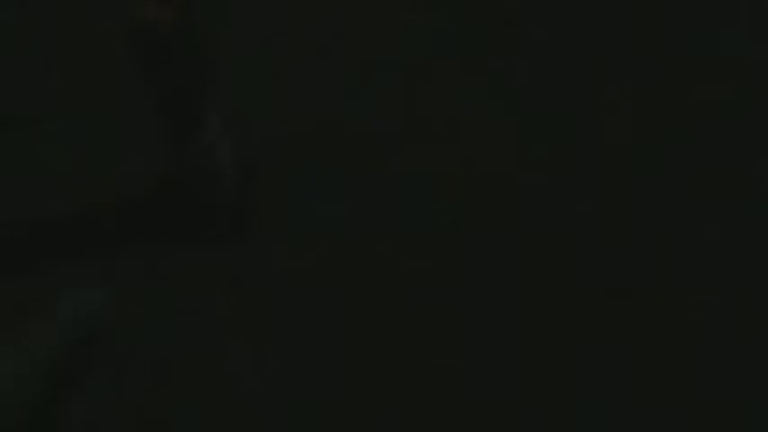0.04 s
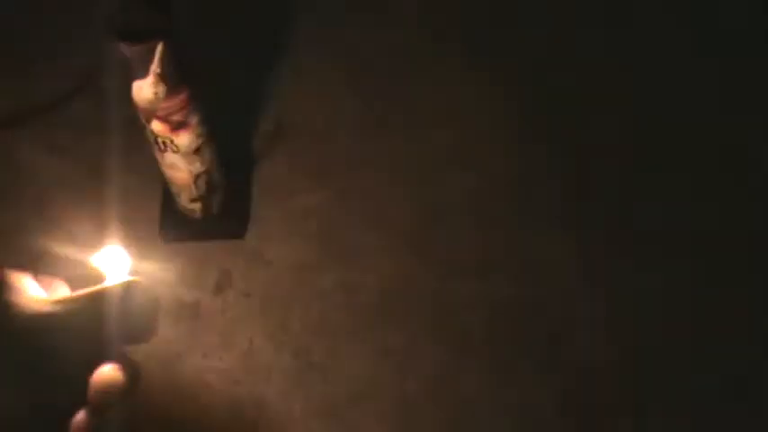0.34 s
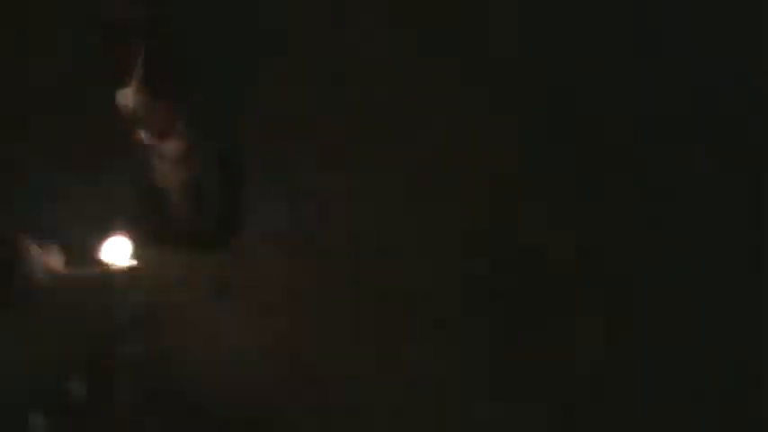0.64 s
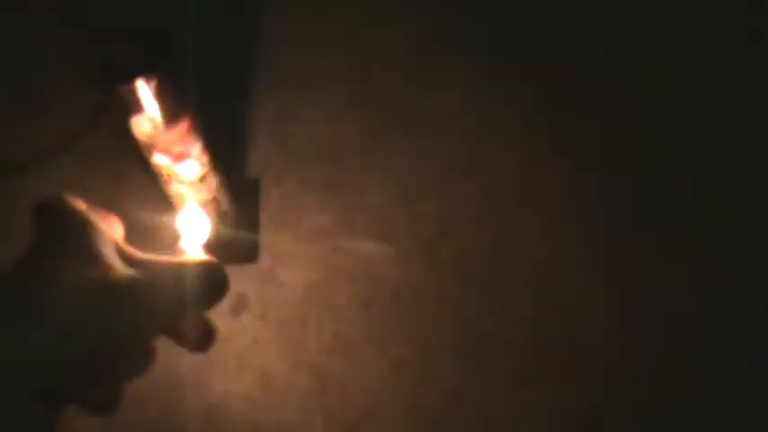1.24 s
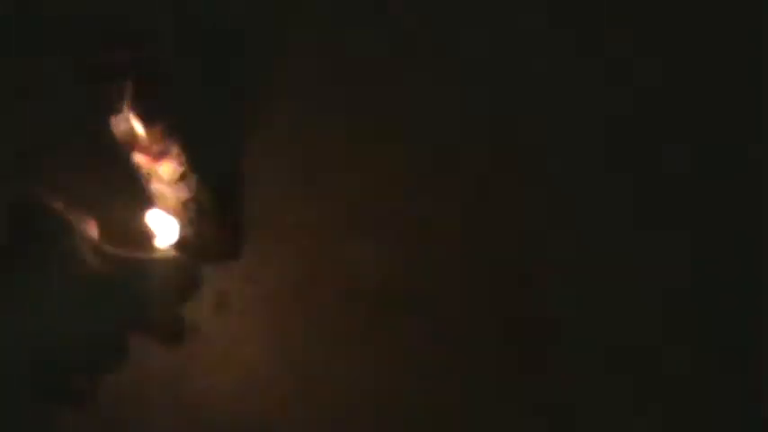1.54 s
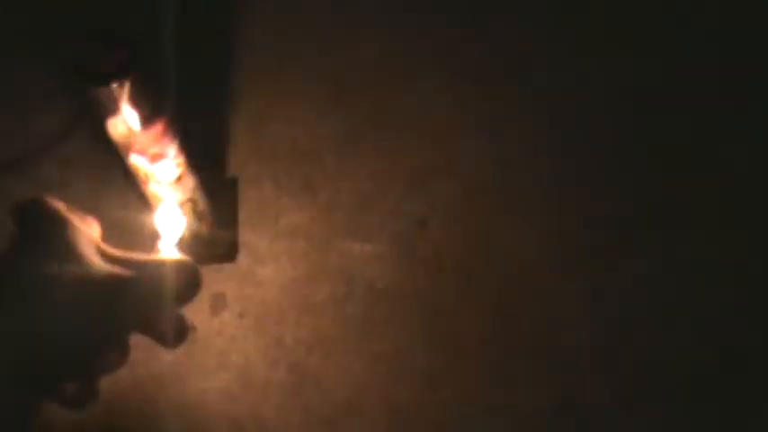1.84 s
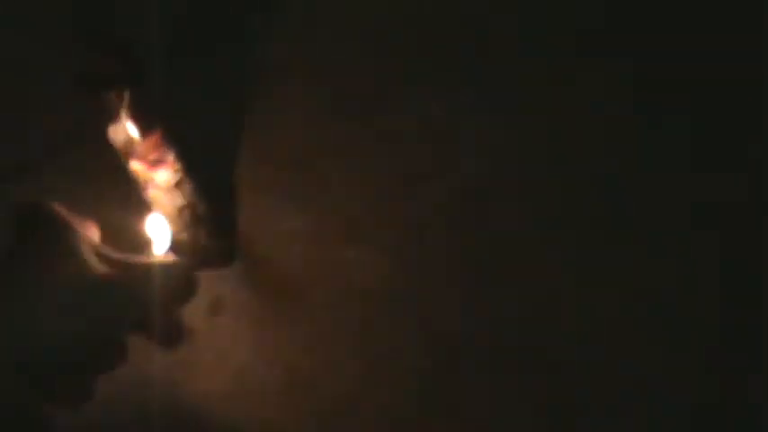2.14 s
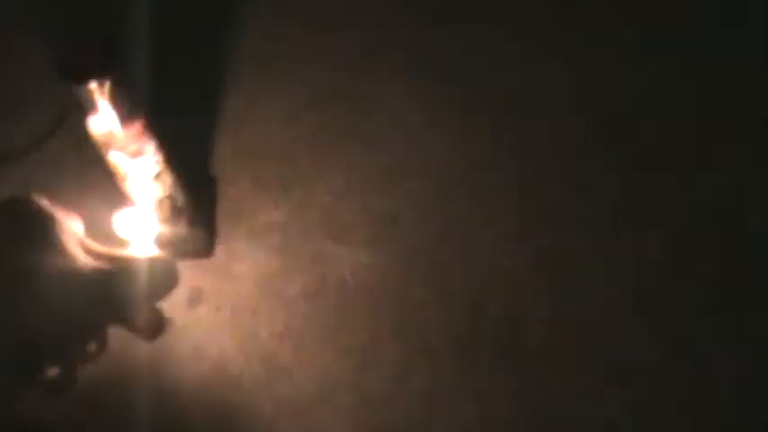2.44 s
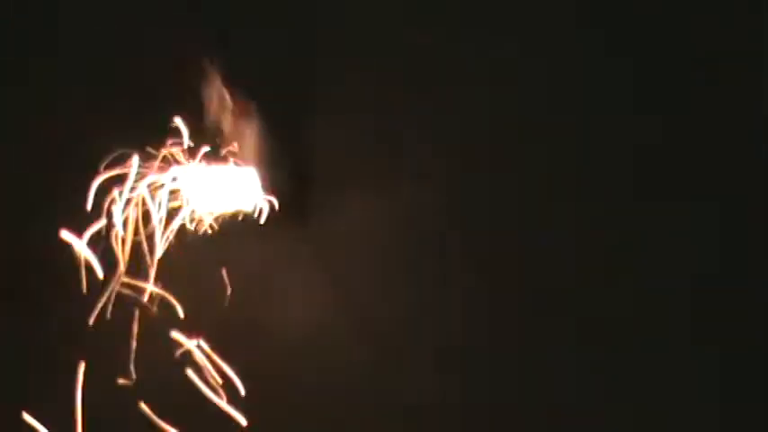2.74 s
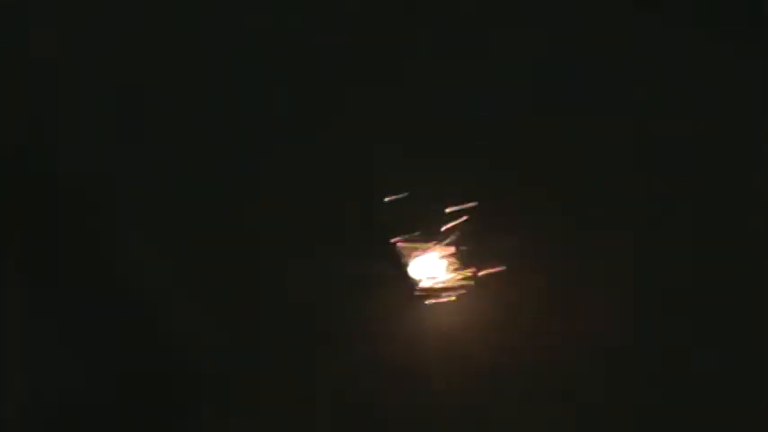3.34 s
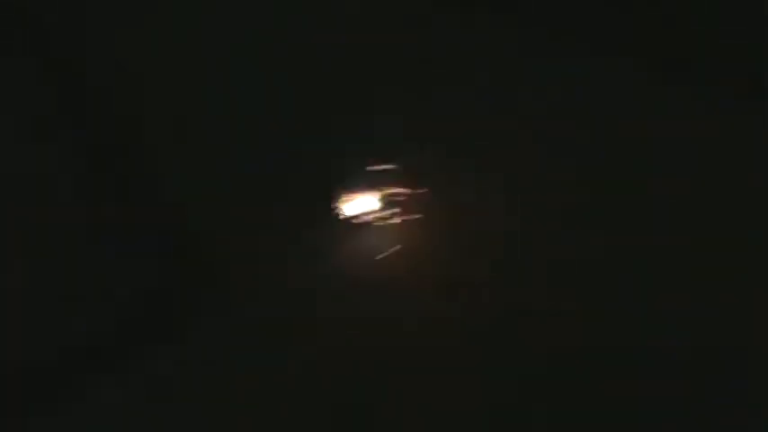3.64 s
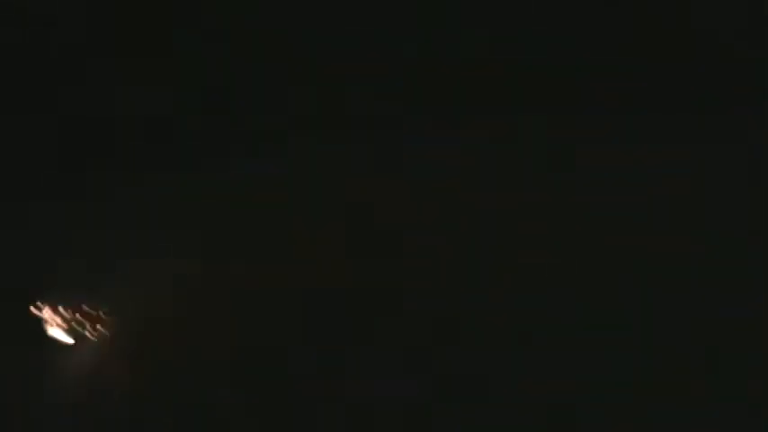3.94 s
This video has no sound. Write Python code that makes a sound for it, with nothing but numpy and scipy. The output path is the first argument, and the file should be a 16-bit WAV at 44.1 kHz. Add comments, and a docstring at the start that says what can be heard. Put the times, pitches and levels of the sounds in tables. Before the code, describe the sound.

A firework fuse flares into a crackling hiss, a couple of seconds after one lighter scrape. The hiss fades as the microphone retreats with air buffeting, knocks and thumps. Crickets and a faraway motor sound faintly throughout.

```python
"""Night outdoors: a distant machine hums and insects trill throughout. At 0.09 s a lighter wheel scrapes.
At 2.4 s a firework fuse catches and flares; its jet hisses and spits sparks, coloured by the ground echo.
From about 2.7 s the jet weakens as the microphone backs away, with air buffeting the ports
and, from 3.3 s, the knocks, scuffs and thumps of the retreat."""
import sys
import numpy as np
from scipy import signal
from scipy.fft import rfft, irfft
from scipy.io import wavfile
from scipy.ndimage import map_coordinates

SR = 44100
rng = np.random.default_rng(int(sys.argv[2]) if len(sys.argv) > 2 else 0)


def to_wav(sig):
    """Store sig (one row per channel, or 1-D mono) as 16-bit WAV at the path in sys.argv[1].

    Samples outside -1..1 are clipped; the rate is SR.
    """
    pcm = np.clip(np.atleast_2d(sig), -1, 1) * 32767
    pcm = np.round(pcm).astype(np.int16)
    wavfile.write(sys.argv[1], SR, pcm.T)  # frames by channels


N = 176400
T = np.arange(N) / SR


def undb(db):
    """Decibels to gain."""
    return 10 ** (np.asarray(db) / 20)


def unit(x):
    """Scale to rms 1."""
    return x / np.sqrt(np.mean(x ** 2))


def curve(rows, column=1):
    """Table column, linear in time."""
    rows = np.array(rows)
    return np.interp(T, rows[:, 0], rows[:, column])


def colour(x, points):
    """Filter by points of f/Hz, gain/dB."""
    hz, db = np.array(points).T
    f = np.maximum(np.fft.rfftfreq(N, 1 / SR), 1)
    return irfft(rfft(x) * undb(np.interp(np.log(f), np.log(hz), db)), N)


def noise():
    """White noise."""
    return rng.standard_normal(N)


def band(hz, width_hz):
    """Bell-shaped noise band, rms 1; at 0 Hz a random waver."""
    f = np.fft.rfftfreq(N, 1 / SR)
    return unit(irfft(rfft(noise()) / (1 + (2 * (f - hz) / width_hz) ** 4), N))


def stereo(mid, side):
    """Mid/side to left/right."""
    return np.array([mid + side, mid - side])


def pan(left_db):
    """Channel gains, left over right by left_db."""
    return undb(np.array([[left_db], [-left_db]]) / 2)


def wide(spectrum, side_spectrum):
    """Coloured stereo noise, side level set per frequency."""
    mid, side = (unit(colour(noise(), spectrum)) for _ in range(2))
    return stereo(mid, colour(side, side_spectrum))


def resample(x, at_samples):
    """Read both channels at moving positions."""
    return np.array([map_coordinates(ch, [at_samples], order=5, mode="mirror") for ch in x])


def grains(per_s, spread_db):
    """Random clicks, a few much larger than the rest."""
    size = undb(spread_db * np.minimum(rng.exponential(size=N), 4))
    return unit((rng.random(N) < per_s / SR) * size * np.sign(noise()))


def bursts(rows, snap, side_db):
    """Per row: pressure step and short rush through one resonance, faint tail from the surroundings."""
    tail_db, tail_s = -19.5, 0.012
    out, t = np.zeros((2, N + SR)), T[:SR // 8]
    for at_s, db, hz, width_hz, decay_ms in rows:
        decay_s = max(decay_ms, 0.2) / 1000
        b, a = signal.iirpeak(min(hz, SR / 4), hz / min(width_hz * 1.7, SR / 4), fs=SR)
        ring = lambda x: signal.lfilter(b, a, signal.lfilter(b, a, signal.lfilter(b, a, x)))
        rush = rng.standard_normal((4, len(t)))
        push = rush[:2] * np.exp(-t / decay_s)
        push[0, 0] += snap * np.sqrt(decay_s * SR / 2)
        mid, side = (unit(ring(p)) * np.sqrt(decay_s / t[-1] / 2) for p in push)
        tail = unit(ring(rush[2:])) * np.exp(-t / tail_s) * undb(tail_db)
        i = int(at_s * SR)
        out[:, i:i + len(t)] += undb(db) * (stereo(mid, side * undb(side_db)) + tail)
    return out[:, :N]


def scrapes(rows, spectrum, per_s, spread_db, side_db):
    """Dense grains that swell and die away."""
    swell = sum(undb(db) * np.exp(-np.maximum((peak_s - T) / rise_s, (T - peak_s) / fall_s))
                for peak_s, db, rise_s, fall_s in rows)
    mid, side = (unit(colour(grains(per_s, spread_db), spectrum)) for _ in range(2))
    return swell * stereo(mid, side * undb(side_db))


def machine():
    """Distant motor: low rumble, narrow drones, thin wavering whistle."""
    # rumble spectrum and its side share: f/Hz, level/dB
    rumble_spectrum = [(20, -23), (50, -4.5), (90, -1.5), (130, -2.5), (190, -7.5), (300, -13),
                       (500, -19.5), (900, -28.5), (1500, -34.5), (2400, -34), (3400, -41), (7000, -51.5),
                       (15800, -48.5)]
    rumble_side = [(100, -42), (200, -12.5), (380, -9), (700, -0.5), (2400, 2), (15000, 2)]
    # drones: f/Hz, width/Hz, level/dB
    drone_bands = [(116.7, 8.7, -41.5), (140, 6.8, -43.5), (258.6, 13, -53.5), (1075, 94, -61.5),
                   (2524, 5, -72)]
    whistle_hz = 1076 + 10.95 * band(0, 43)
    phase = 2 * np.pi * np.cumsum(whistle_hz) / SR
    flicker_db = 1.8 * band(0, 40)
    whistle = unit(np.sin(phase) * undb(flicker_db)) * undb(-54.5)
    drones = sum(band(hz, width_hz) * undb(db) for hz, width_hz, db in drone_bands)
    rumble = wide(rumble_spectrum, rumble_side) * undb(-39)
    return (rumble + drones + whistle) * pan(left_db=1.0)


def cricket():
    """Near cricket: one falling chirp per wing stroke."""
    stroke_hz, jitter_s, scatter_db = 48.2, 0.000782, 2.4
    chirp_hz, fall_hz_per_s, sigma_s = 4338, 59000, 0.0034
    start_db, rise_db_per_s = -58.5, 1
    stroke = (T * stroke_hz).astype(int)
    late, size, detune = rng.standard_normal((N // 100, 3))[stroke].T
    t = T - (stroke + 0.5) / stroke_hz - jitter_s * late
    chirp = np.sin(2 * np.pi * (chirp_hz * (1 + 0.015 * detune) * t - fall_hz_per_s * t ** 2 / 2))
    gate = np.abs(np.sin(np.pi * T * stroke_hz)) * np.exp(-(t / sigma_s) ** 2 / 2)
    return unit(chirp * gate * undb(scatter_db * size)) * undb(start_db + rise_db_per_s * T)


def chorus():
    """Farther insects, merged into shimmering noise."""
    # chorus spectrum: f/Hz, level/dB
    spectrum = [(3300, -22.5), (3900, -5), (4300, 0.5), (4900, -10), (6000, -19), (7700, -19), (8900, -7.5),
                (9700, 3), (10700, 0.5), (12000, -8), (14500, -21)]
    mid, side = (unit(colour(noise(), spectrum)) for _ in range(2))
    shimmer_db = 0.69 * band(0, 200)
    return stereo(mid, side * undb(-9.5)) * undb(-50.5 + shimmer_db)


def thumps():
    """Each jolt makes the microphone boom for a few cycles."""
    # jolts: peak t/s, level/dB, f/Hz, rise/s, fall/s
    jolts = [(2.402, -28, 102, .005, 0.023), (3.371, -19, 85, .012, .012), (3.863, -12, 56.7, 0.025, 0.05)]
    out = 0
    for peak_s, db, hz, rise_s, fall_s in jolts:
        t = T - peak_s
        envelope = np.exp(-(t / np.where(t < 0, rise_s, fall_s)) ** 2)
        out = out + undb(db) * envelope * np.cos(2 * np.pi * hz * t)
    return out * pan(left_db=4)


def buffeting():
    """Air buffets the ports of the moving microphone."""
    # air spectrum and its side share: f/Hz, level/dB
    air_spectrum = [(18, -1.5), (35, -4), (58, -1), (100, -4.5), (165, -6), (280, -17), (550, -27),
                    (1500, -43), (6000, -64)]
    air_side = [(50, -5), (110, 0), (220, 3), (500, 3)]
    # gusts on the ports: t/s, level/dB
    gusts = [(2.75, -68), (2.87, -30.5), (3.0, -44), (3.24, -52), (3.33, -25), (3.365, -17), (3.42, -25.5),
             (3.52, -24), (3.59, -19.5), (3.66, -18.5), (3.69, -25.5), (3.77, -26), (3.82, -18),
             (3.865, -19), (3.9, -20), (3.93, -20), (4.0, -23)]
    return wide(air_spectrum, air_side) * undb(curve(gusts) + 2.7 * band(0, 89)) * pan(left_db=1.2)


def retreat():
    """Backing away: friction on the ground, knocks and clicks."""
    # scuffs: peak t/s, level/dB, rise/s, fall/s
    scuff_swells = [(3.602, -18, 0.0022, 0.0049), (3.617, -16, 0.012, .017), (3.80, -28.5, .008, 0.013),
                    (3.892, -30.5, 0.0092, 0.0094), (3.925, -26, .015, 0.022)]
    # scuff spectrum: f/Hz, level/dB
    scuff_spectrum = [(100, -19), (350, -0.5), (650, 5), (1100, -6.5), (1700, -2), (3800, -3.5),
                      (5500, -11.5), (8000, -27), (15000, -35)]
    # knocks: t/s, level/dB, f/Hz, width/Hz, decay/ms
    knocks = [(3.351, -20.5, 450, 440, 8.8), (3.387, -22.5, 700, 1000, 2.9), (3.511, -18, 4550, 6900, 1.4),
              (3.5115, -19.5, 1170, 510, 9), (3.7052, -18, 3070, 1190, 3.8), (3.708, -21.5, 650, 694, 22),
              (3.7312, -12, 3180, 2930, 1.3), (3.728, -24, 1490, 1030, 13), (3.755, -20.5, 503, 1500, 1.9),
              (3.789, -22.5, 480, 790, 7)]
    scuffs = scrapes(scuff_swells, scuff_spectrum, per_s=7000, spread_db=3.0, side_db=-15.5)
    return scuffs + bursts(knocks, snap=0.75, side_db=-7.5)


def lighter():
    """The wheel rasps over the flint, clicks and leaves the metal cap ringing."""
    # wheel stroke: peak t/s, level/dB, rise/s, fall/s
    wheel = [(0.089, -27.5, 0.014, 0.013)]
    # flint spectrum: f/Hz, level/dB
    flint = [(300, -24), (1000, -7.5), (2600, 2), (5500, 1.5), (8000, -8), (12000, -7), (15800, -16)]
    # clicks: t/s, level/dB, f/Hz, width/Hz, decay/ms
    click_events = [(0.0852, -23, 4000, 5000, 0.91), (0.0892, -10.5, 4700, 4160, 1.27),
                    (0.0896, -25, 11000, 9000, 1.3), (0.1182, -37, 9000, 7000, 1.2),
                    (0.1492, -26, 4600, 3080, 1.2), (0.26, -39.5, 5000, 4000, 1.5),
                    (1.54, -50.5, 6000, 3000, 1.5)]
    # cap modes: f/Hz, level/dB, t60/s
    cap_modes = [(1570, -34, 0.061), (3950, -40, .065), (4870, -42, .07), (6379, -31, .046)]
    t = np.maximum(T - wheel[0][0], 0)
    ring = sum(undb(db - 60 * t / t60_s) * np.sin(2 * np.pi * hz * t) for hz, db, t60_s in cap_modes)
    clicks = bursts(click_events, snap=0.3, side_db=-10)
    return scrapes(wheel, flint, per_s=12000, spread_db=1.0, side_db=-15) + clicks + ring


def flare():
    """Brief rush as the powder catches."""
    # swell: peak t/s, level/dB, rise/s, fall/s
    swell = [(2.575, -25.5, 0.038, 0.035)]
    # flare spectrum: f/Hz, level/dB
    spectrum = [(600, -22), (1300, -7), (1750, 1), (2200, -1), (3000, -24), (8000, -40)]
    return scrapes(swell, spectrum, per_s=12000, spread_db=1, side_db=-20)


def sparks():
    """Sparks from the fuse burst with short pops."""
    # pops: t/s, level/dB, f/Hz, width/Hz, decay/ms
    pops = [(2.700, -21, 1120, 1200, 5), (2.7465, -19, 1060, 1800, 8.5), (2.759, -20, 1490, 2500, 3.9),
            (2.7692, -9.5, 870, 1000, 1.1), (2.7815, -16.5, 880, 1200, 2.9), (2.790, -21.5, 480, 600, 7.8),
            (2.815, -17, 1190, 3000, 1.4), (2.840, -15, 2280, 2600, 3), (2.8692, -14.5, 1080, 670, 3.9),
            (2.9175, -20.5, 1370, 1800, 2), (3.045, -25, 1020, 1530, 13), (3.270, -29, 2000, 2000, 2),
            (3.2855, -24.5, 1200, 1500, 3), (3.295, -20.5, 2110, 2400, 3.2),
            (3.325, -22.5, 1910, 2400, 3.3)]
    return bursts(pops, snap=0.48, side_db=-11.5) * pan(left_db=2.2)


def ground_echo(direct):
    """The ground reflection combs the sound; its lag shrinks with distance."""
    # echo delay: t/s, lag/ms
    lag_ms = [(2.45, 0.47), (2.72, 0.46), (2.93, 0.46), (3.1, 0.42), (3.25, 0.4), (3.45, .335), (3.56, 0.3),
              (3.72, 0.26), (3.85, .25), (3.97, 0.18)]
    # echo strength: t/s, echo/direct ratio
    share = [(3.1, 0.4), (3.8, 0.29)]
    echo = resample(direct, (T - curve(lag_ms) / 1000) * SR)
    return (direct + curve(share) * echo) / np.hypot(1, curve(share))


def eddies(x):
    """Turbulence: neighbouring bands swell and fade independently."""
    depth_db, eddy_s, width_hz = 1.7, 0.035, 330
    f, t, spectra = signal.stft(x, SR, nperseg=512)
    nodes = rng.standard_normal((int(SR / 2 / width_hz) + 2, int(t[-1] / eddy_s) + 2))
    grid = np.meshgrid(f / width_hz, t / eddy_s, indexing="ij")
    field = map_coordinates(nodes, grid, order=3, mode="mirror")
    return signal.istft(spectra * unit(undb(depth_db * field)), SR)[1][:, :N]


def jet():
    """Turbulent jet of the fuse: fluttering hiss with fine crackle, sputtering low rasp, top sizzle."""
    # jet envelope: t/s, base level/dB of hiss, rasp, sizzle
    levels = [(2.434, -78, -82, -85), (2.441, -40.5, -46, -45), (2.5, -32.5, -34.5, -36),
              (2.55, -29, -30.5, -46), (2.605, -23, -33.5, -29), (2.66, -22, -35, -26.5),
              (2.73, -23.5, -33, -27), (2.82, -26.5, -31.5, -35), (2.88, -27, -34, -30),
              (2.95, -28, -37.5, -30), (3.08, -30, -36.5, -32), (3.22, -31, -41, -39.5),
              (3.3, -33.5, -35, -45), (3.5, -35.5, -40.5, -37.5), (3.6, -35.5, -34, -46),
              (3.7, -35.5, -48, -42.5), (3.8, -40.5, -39.5, -49), (3.96, -35, -40.5, -60),
              (4.0, -43.5, -49, -47)]
    # layer spectra and their common side share: f/Hz, level/dB
    hiss_spectrum = [(1500, -21.5), (3000, -1.5), (4200, -1.5), (6300, -0.5), (8000, -4), (10000, -9),
                     (15800, -18)]
    rasp_spectrum = [(150, -7), (400, -2.5), (900, -0.5), (1700, -2.5), (2400, 0.5), (3500, -7.5),
                     (6000, -13), (15000, -45)]
    sizzle_spectrum = [(4000, -30), (7000, 0.5), (8800, 3.5), (11500, 0), (12400, -14), (13200, -16),
                       (15800, -7.5)]
    side = [(200, -9), (1200, -10.5), (2400, -30), (4400, -19.5), (8000, -9.5), (15000, -2)]
    # upward shift of the sizzle: t/s, frequency ratio
    sizzle_shift = [(2.8, 1.1), (3.1, 1.025), (3.5, 1.09)]
    wander_db, wander_width_hz = 0.35, 40
    flutter_db = 0.5 + band(0, 128)
    hiss = wide(hiss_spectrum, side)
    crackle = undb(-13.5) * unit(colour(grains(per_s=300, spread_db=6), hiss_spectrum))
    hiss_db = curve(levels, column=1) + flutter_db + wander_db * band(0, wander_width_hz)
    rasp = wide(rasp_spectrum, side)
    sputter_db = 3 + 1.5 * band(0, 256)
    rasp_db = curve(levels, column=2) + sputter_db
    sizzle = resample(wide(sizzle_spectrum, side), np.cumsum(curve(sizzle_shift)))
    sizzle_db = curve(levels, column=3) + flutter_db + wander_db * band(0, wander_width_hz)
    return eddies((hiss + crackle) * undb(hiss_db) + rasp * undb(rasp_db) + sizzle * undb(sizzle_db))


def scene():
    """All sources at the microphone."""
    night = machine() + cricket() + chorus()
    ignition = lighter() + ground_echo(jet()) + flare() + sparks()
    return night + ignition + buffeting() + retreat() + thumps()


def record(dry):
    """Steep low-pass of the recorder."""
    top_hz = 15750
    return signal.sosfilt(signal.ellip(10, 0.2, 80, top_hz, fs=SR, output="sos"), dry)


dry = scene()
out = record(dry)
to_wav(out)
```